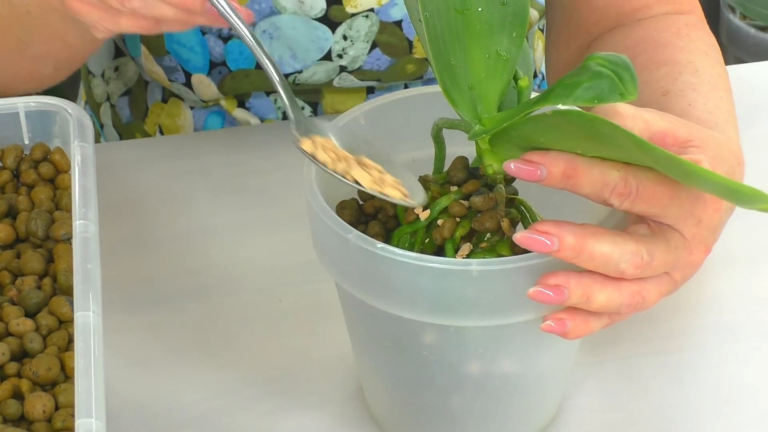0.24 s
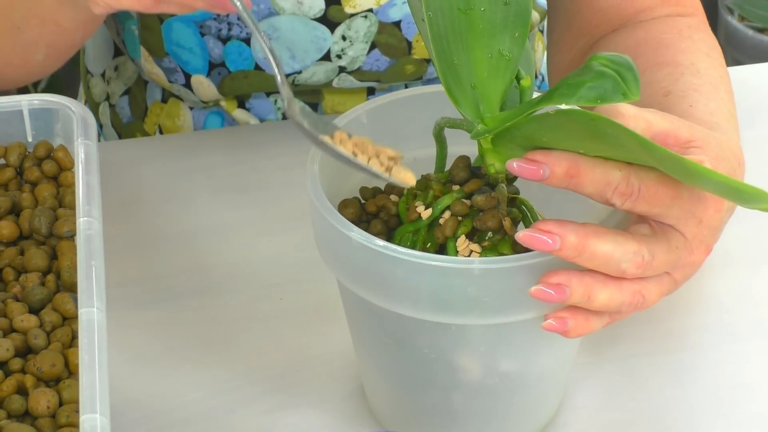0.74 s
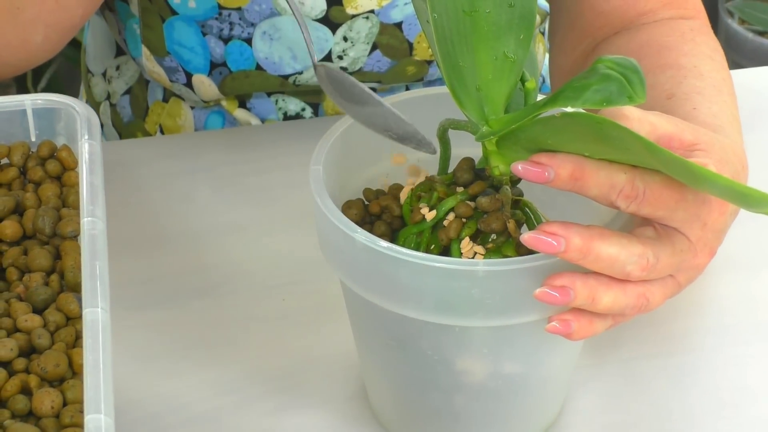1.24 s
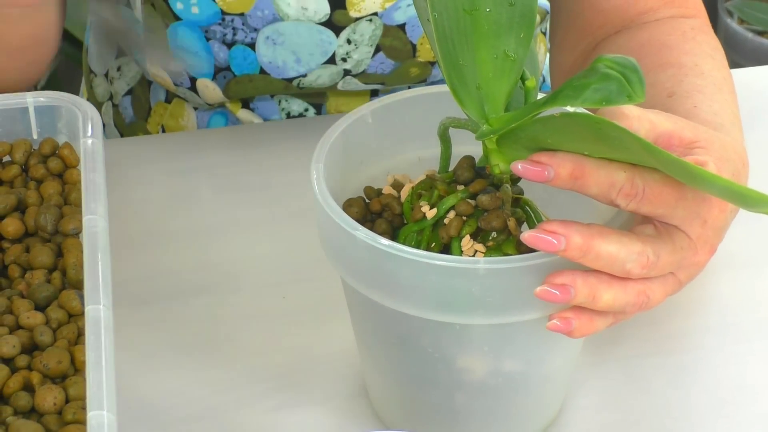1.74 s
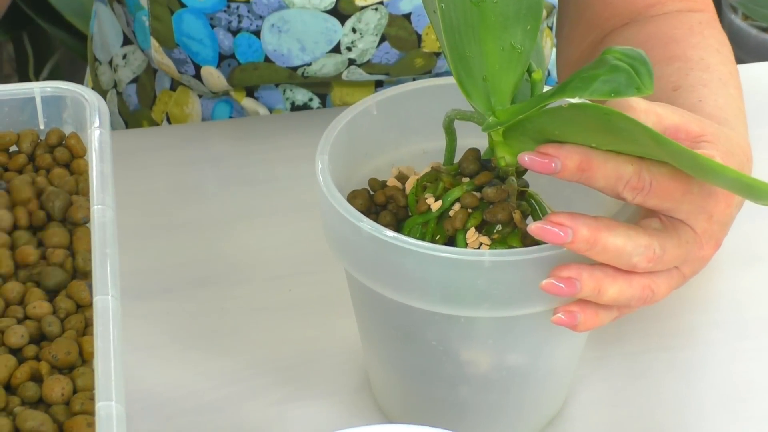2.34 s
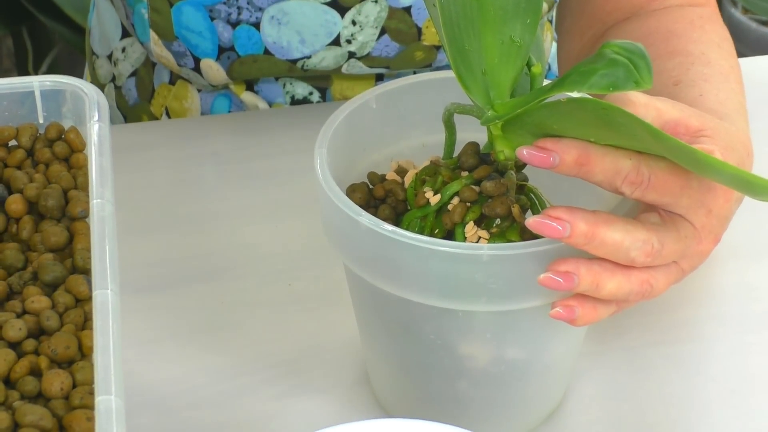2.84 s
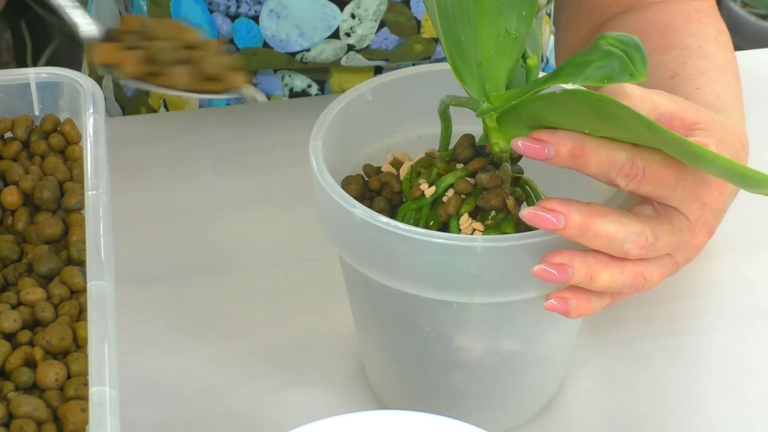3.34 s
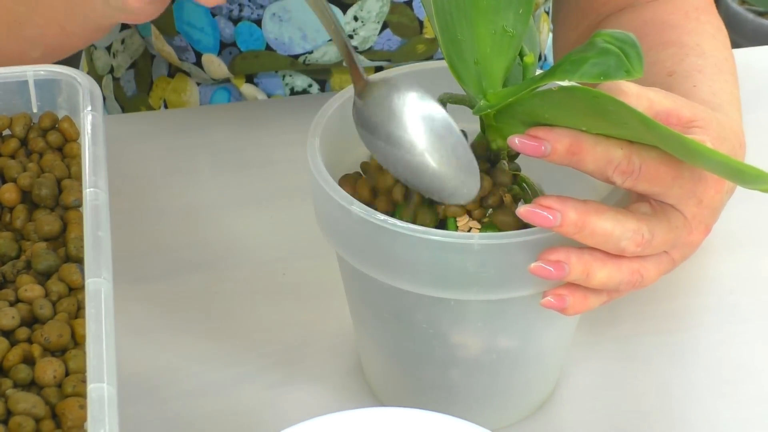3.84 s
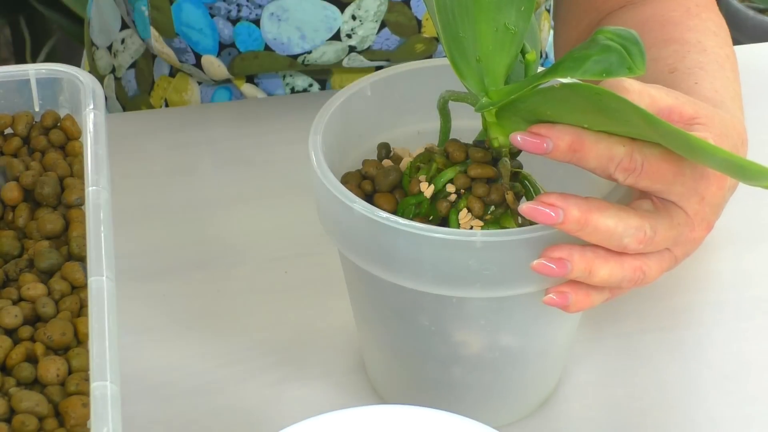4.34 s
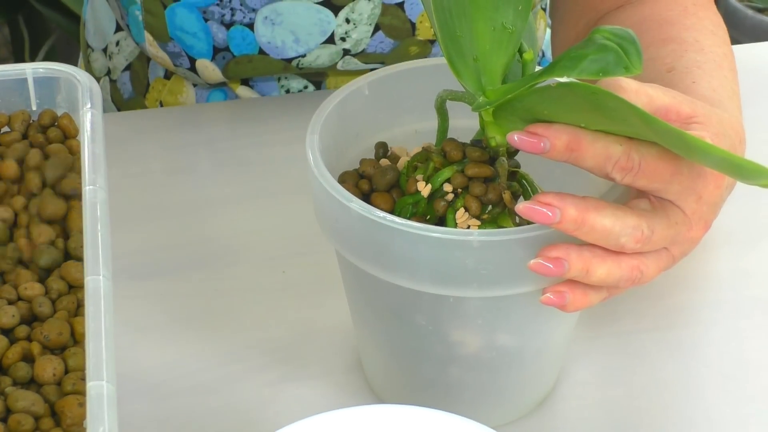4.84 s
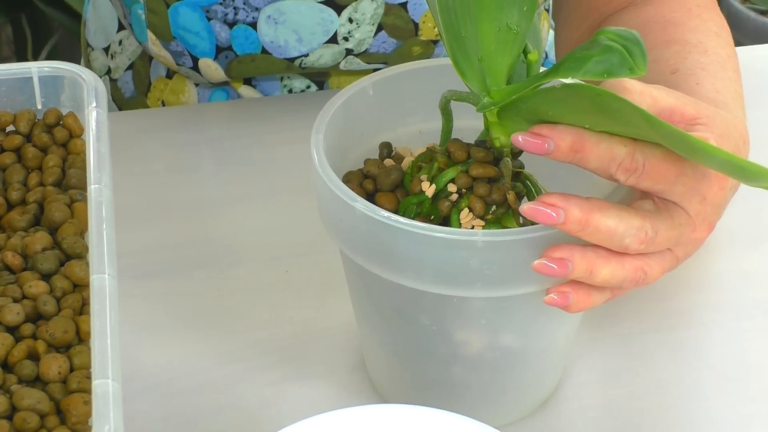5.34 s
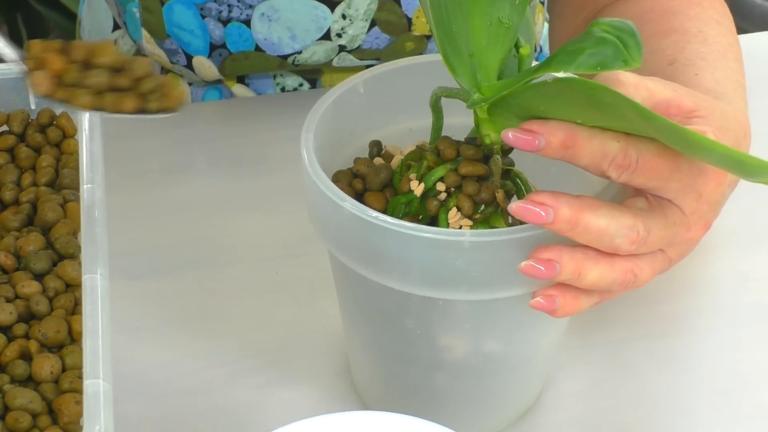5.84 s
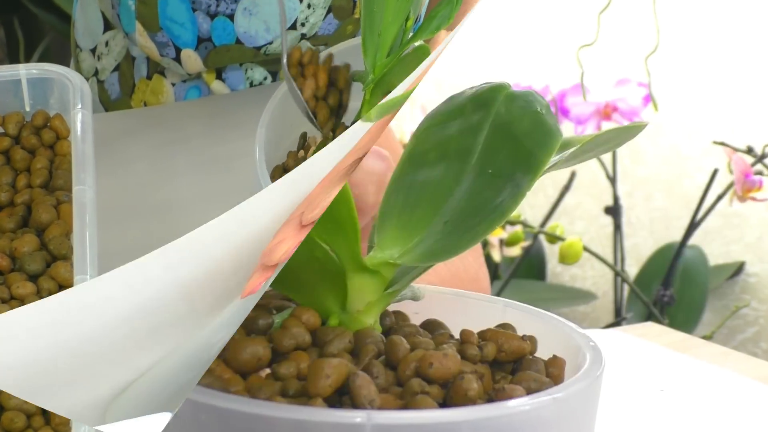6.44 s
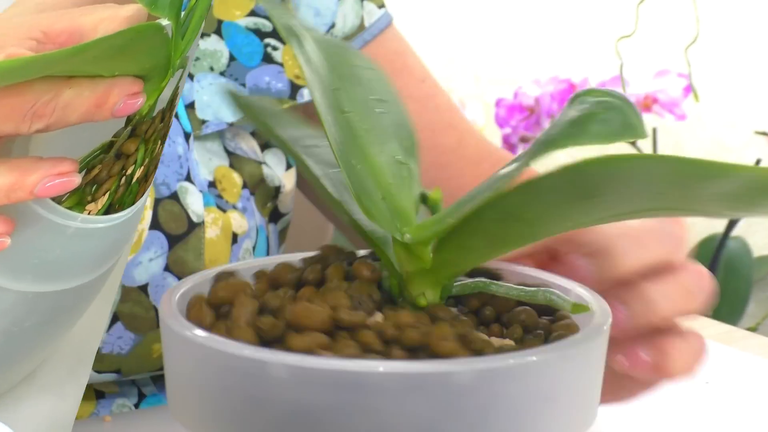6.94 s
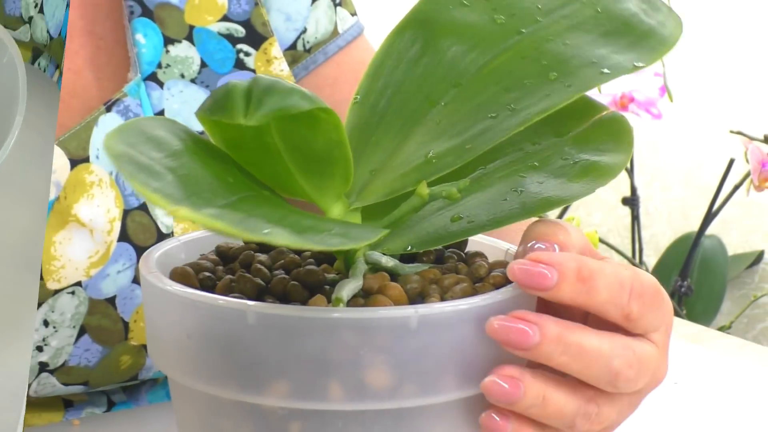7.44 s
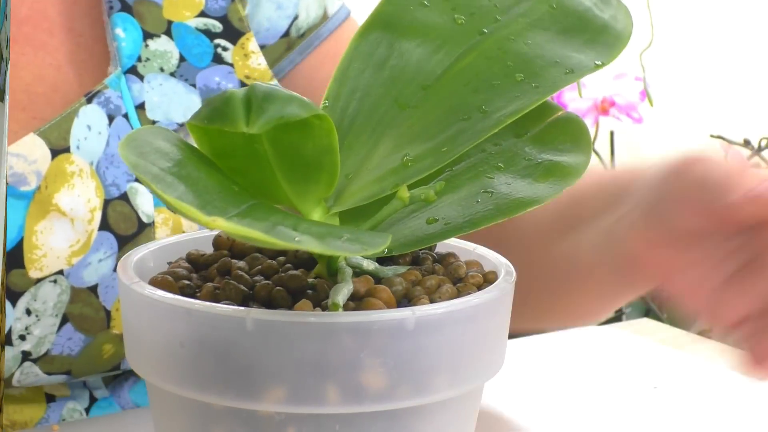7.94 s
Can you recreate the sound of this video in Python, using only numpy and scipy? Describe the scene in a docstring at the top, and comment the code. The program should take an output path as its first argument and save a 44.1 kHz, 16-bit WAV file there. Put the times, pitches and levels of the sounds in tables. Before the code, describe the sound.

Dry clay pellets slide off a metal spoon and rattle into a plastic pot, then the spoon crunches through a tub of pellets, repeatedly.

```python
"""A quiet room's hush comes first, then dry clay pellets slide off a steel spoon and rattle into a plastic pot.
The spoon then digs into a plastic tub of pellets; tipping and digging alternate three times.
Each pellet contact is a tiny noise crack, filtered by the heap and by the container's resonances.
Contacts on the steel ring the spoon's modes; late on, one knock rings the pot. A small room answers."""
import sys
import numpy as np
from scipy import signal
from scipy.fft import rfft, irfft, next_fast_len
from scipy.io import wavfile
from scipy.ndimage import map_coordinates

SR = 44100
rng = np.random.default_rng(int(sys.argv[2]) if len(sys.argv) > 2 else 0)


def store_pcm(level_fs):
    """Save levels as 16-bit WAV."""
    pcm = np.round(np.clip(level_fs, -1, 1) * 32767).astype(np.int16)
    wavfile.write(sys.argv[1], SR, np.atleast_2d(pcm).T)


N = 360738


def amp(db):
    """Level definition: dB to amplitude gain."""
    return 10 ** (np.asarray(db) / 20)


def along(points, hz):
    """Logarithmic frequency scale: interpolates (frequency [Hz], value) points."""
    f, v = np.transpose(points)
    return np.interp(np.log(hz + 1), np.log(f + 1), v)


def over_time(points):
    """Linear interpolation of (time [s], value) points, one value per sample."""
    return np.interp(np.arange(N) / SR, *np.transpose(points))


def filtered(x, response):
    """Linear filtering: the spectrum of x times a complex response of frequency."""
    m = next_fast_len(N + SR // 2)
    return irfft(rfft(x, m) * response(np.fft.rfftfreq(m, 1 / SR)), m)[..., :N]


def through(x, impulse):
    """Convolution with an impulse response scaled to unit energy."""
    return signal.oaconvolve(x, impulse / np.linalg.norm(impulse))[:N]


def colour(spectrum, size=2048):
    """Minimum phase: the causal impulse with this spectrum, by folding its cepstrum."""
    cepstrum = irfft(np.log(amp(np.maximum(along(spectrum, np.fft.rfftfreq(size, 1 / SR)), -70))))
    cepstrum[1:size // 2] *= 2
    cepstrum[size // 2 + 1:] = 0
    return irfft(np.exp(rfft(cepstrum)))


def ringing(modes):
    """Modal synthesis: a sum of exponentially damped sines, (frequency [Hz], level [dB], t60 [s])."""
    t = np.arange(SR // 2) / SR
    return sum(amp(db - 60 * t / t60) * np.sin(2 * np.pi * hz * t) for hz, db, t60 in modes)


def walls(peaks):
    """Bandwidth and decay are reciprocal: wall resonances given by width become damped sines."""
    return ringing([(hz, db + 20 * np.log10(width), np.log(1000) / (np.pi * width))
                    for hz, width, db in peaks])


def gains(tables):
    """Piecewise level envelopes: a gain per sample for each dB column, silent between the tables."""
    t, out = np.arange(N) / SR, np.zeros((len(tables[0][0]) - 1, N))
    for rows in tables:
        s, *columns = np.transpose(rows)
        out += [amp(np.interp(t, s, column, -200, -200)) for column in columns]
    return out


def wander(per_s):
    """Random modulation: straight pieces between normal random values, per_s of them a second."""
    knots = rng.standard_normal(int(N * per_s / SR) + 4)
    return map_coordinates(knots, [np.arange(N) * per_s / SR], order=1)


def cracks(blows, t60):
    """Decaying noise bursts: energies of overlapping blows add, and each burst has its own colour."""
    fade = amp(-60 * np.arange(SR // 20) / SR / t60)
    energy = signal.oaconvolve(blows ** 2, fade ** 2)[:N]
    return np.sqrt(np.abs(energy)) * rng.standard_normal(N)


def contacts(per_s, spread_db, t60, blur):
    """Shot noise of pellet contacts, many small and a few large, plus steady noise for the dense share."""
    chance, size = rng.random((2, N))
    blows = (chance < per_s / SR) * amp(-spread_db * np.log(size + 0.0092))
    x = cracks(blows, t60)
    blur = np.clip(blur, 0, 1)  # power share too dense to tell apart
    return np.sqrt(1 - blur) * x / x.std() + np.sqrt(blur) * rng.standard_normal(N)


RAP_SCATTER, RAP_CYCLES = 0.356, 9.5  # spread of log pitch; t60 in cycles
RAP_DB = -8  # against the crunch


def raps(gain, per_s, centre_hz):
    """Cavity resonance: random pellets each ring briefly and hollowly at a pitch of their own."""
    when, size, pitch = rng.random((3, round(2 * per_s * N / SR)))
    at, t = (when * (N - 1)).astype(int), np.arange(SR // 80) / SR
    log_offset = RAP_SCATTER * np.log(pitch / (1 - pitch)) / 2
    hz = np.clip(centre_hz * np.exp(log_offset), 820, 6000)[:, None]
    decay = amp(-60 * t * hz / RAP_CYCLES)
    onset = 1 - np.exp(-t * hz)
    rings = amp(-3 * np.log(size + .05))[:, None] * decay * np.sin(2 * np.pi * hz * t) * onset
    rings *= np.sqrt(N / np.sum(rings ** 2)) * gain[at, None]  # rms 1, then the crunch gain
    samples = at[:, None] + np.arange(len(t))
    return amp(RAP_DB) * np.bincount(samples.ravel(), rings.ravel(), N + SR)[:N]


HEAP_SHIFT, HEAP_SHIFTS_PER_S = 0.21, 22  # the heap's hollows change as it moves: rise in log pitch, rate
HOLLOW_HZ = 1557  # corner of the high-pass that thins the body


def rattle(levels, crunch, fizz, box, per_s, spread_db, blur, low_db, rap_hz):
    """Source and filter: the same contacts excite heap and container; denser, shorter ones tick brightly."""
    crunch_gain, fizz_gain, box_gain = levels
    heap = contacts(per_s, spread_db, 0.014, blur)
    ticks = contacts(2.2 * per_s, spread_db, 0.012, blur)

    # an equal-power crossfade wanders between two heap spectra, the second higher in pitch
    turn = np.pi / 4 * (1 + np.tanh(wander(HEAP_SHIFTS_PER_S)))
    deep = colour(crunch)
    tight = colour([(hz * np.exp(HEAP_SHIFT), db) for hz, db in crunch])
    deep_drive = crunch_gain * heap * np.cos(turn)
    tight_drive = crunch_gain * heap * np.sin(turn) * rng.choice([-1, 1], N)
    body = through(deep_drive, deep) + through(tight_drive, tight) + raps(crunch_gain, per_s, rap_hz)

    # lowering the low crunch hands over to a high-passed copy
    thin = filtered(body, lambda hz: (1j * hz / (HOLLOW_HZ + 1j * hz)) ** 3)
    body = amp(low_db) * body + 2 * (1 - amp(low_db)) * thin
    return body + through(fizz_gain * ticks, colour(fizz)) + through(box_gain * heap, walls(box))


# Spectrum of the hush: (frequency [Hz], relative density [dB per Hz])
AIR_SPECTRUM = [(12, -54), (20, -7.5), (38, -12.5), (74, -10), (182, -2.5), (255, -7.5), (285, -5),
                (422, -10), (558, -19.5), (897, -10.5), (1120, -11), (2600, -16), (5230, -32),
                (16000, -25.5)]
# Left-right correlation of the hush: (frequency [Hz], likeness [0 to 1])
AIR_LIKENESS = [(60, 0.4), (240, 0.54), (950, 0.74), (3770, 0.22), (15000, 0.99)]
AIR_DB = -55  # rms level of its mid signal


def air():
    """Partly coherent field: the steady hush of the room and the microphone, as mid and side noise."""
    def mid_and_side(hz):
        turn = np.arccos(np.clip(along(AIR_LIKENESS, hz), -1, 1)) / 2
        return amp(along(AIR_SPECTRUM, hz)) * [np.cos(turn), np.sin(turn)]

    mid, side = filtered(rng.standard_normal((2, N)), mid_and_side)
    return amp(AIR_DB) * np.array([mid + side, mid - side]) / mid.std()


# Modes of the steel bowl: (frequency [Hz], relative level [dB], t60 [s])
SPOON_MODES = [(2815, -2, .045), (3640, -4, .04), (5300, -8, .05), (6610, 3, .065), (7630, -11, .06),
               (8500, -6, .06), (9780, -7, .06), (10195, 2, .08), (11700, -13, .05), (12680, -2, .06),
               (13930, -4, .05), (14750, -10, .05)]
# Pellets sliding over steel; a release later than the end leaves the ring to stop at full level:
# (start [s], full [s], release [s], end [s], ring [dB])
SLIDES = [(0.297, 0.424, .6, 0.64, -52), (2.031, 2.041, 2.8, 2.6, -40.5), (3.75, 3.779, 3.75, 4.1, -41),
          (4.51, 4.525, 6.6, 5, -40), (6.364, 6.428, 6.7, 6.9, -40), (7.413, 7.423, 8.3, 7.5, -55.5),
          (7.52, 7.68, 10, 8.5, -43)]
SLIDE_FADE_DB = 17.5  # how far under the full ring a slide starts, and ends if released
CLINK_DB = -14.5  # a pellet that strikes during a dig also rings the spoon, against its tick


def spoon():
    """Modal excitation by position: contacts wander over the bowl, so each mode swells and fades alone."""
    shapes = [[(start, db - SLIDE_FADE_DB), (full, db), (release, db), (end, db - SLIDE_FADE_DB)]
              for start, full, release, end, db in SLIDES]
    strokes = gains(shapes)[0] * contacts(700, 4.5, 0.0021, 0.3)
    for s, tick_db, *_ in PELLET_STRIKES:
        if any(rows[0][0] <= s <= rows[-1][0] for rows in DRAGS):
            strokes[round(s * SR)] += amp(tick_db + CLINK_DB) * np.sqrt(SR / 1000)

    out = np.zeros(N)
    for mode in SPOON_MODES:
        place = amp(2.5 * wander(12))
        out += signal.oaconvolve(strokes * place, ringing([mode])[:SR // 8])[:N]
    return out / np.linalg.norm(ringing(SPOON_MODES))


# Reverberation time: (frequency [Hz], t60 [s])
ROOM_DECAY = [(200, 0.36), (1500, 0.28), (5000, 0.082), (14000, 0.12)]
# Diffuse share: (frequency [Hz], level [dB])
ROOM_SHARE = [(200, -6), (1000, -5.5), (3000, -7), (7000, -16.5), (14000, -73)]


def room(x):
    """Diffuse reverberation: decaying noise tails, new every fifth of a second, different in each channel."""
    out, hop = np.zeros((2, N + SR)), SR // 5
    delay = 130  # samples, about 3 ms
    hz, t, _ = signal.stft(np.zeros(SR // 3), SR, nperseg=128)
    t60 = along(ROOM_DECAY, hz)[:, None]
    shape = amp(along(ROOM_SHARE, hz)[:, None] - 60 * t / t60) / np.sqrt(t60)
    for a in range(0, N, hop):
        z = signal.stft(rng.standard_normal((2, SR // 3)), SR, nperseg=128)[2]
        tail = signal.istft(z * shape, SR, nperseg=128)[1] * np.sqrt(2 * np.log(1000) / SR)
        y = signal.fftconvolve(x[None, a:a + hop], tail, axes=1)
        out[:, a + delay:a + delay + y.shape[1]] += y
    return out[:, :N]


# Steady trickles into the pot: (time [s], crunch [dB], fizz [dB])
TRICKLES = [
    [(.4, -85, -63.5), (.54, -52, -54), (1.2, -42, -48.5), (1.24, -37, -36.5), (1.46, -41.5, -47),
     (1.62, -42, -60), (1.75, -84, -83)],
    [(3.7, -65, -58.5), (3.96, -36, -37), (4.09, -32.5, -37), (4.34, -48.5, -45.5), (4.48, -59, -66)],
    [(6.36, -63, -62.5), (6.48, -51, -36), (6.55, -33, -31), (6.73, -35.5, -29), (6.95, -38.5, -41),
     (6.97, -40, -51), (7.18, -59, -64)],
]
# Clumps that land in the pot, then tumble to rest: (time [s], crunch [dB], fizz [dB], t60 [s])
CLUMPS = [(0.549, -32, -41, 0.59), (0.622, -33, -31, 0.11), (0.697, -32.5, -39.5, 0.16),
          (0.7563, -37, -44, 0.12), (0.907, -30.5, -47, .084), (0.995, -31, -29.5, 0.04),
          (1.0054, -23.5, -26, 0.18), (1.1086, -29.5, -30, 0.15), (1.227, -28, -44, 0.11),
          (1.281, -36.5, -44, 0.37), (1.3526, -26.5, -28, 0.12), (1.41, -34, -30.5, 0.27),
          (1.5245, -30.5, -48, 0.082), (1.557, -37, -44, 0.24), (3.774, -54, -35.5, 1),
          (3.883, -33, -36, 0.39), (3.905, -27.5, -32, 0.19), (3.994, -22.5, -35, 0.077),
          (4.0617, -32, -40, 0.22), (4.09, -26, -33, 0.36), (4.1614, -24, -36, 0.094),
          (4.181, -25, -36, 0.29), (4.228, -30, -36, .067), (4.313, -36.5, -45.5, 0.099),
          (6.571, -31, -53, 0.17), (6.6438, -24.5, -41.5, 0.27), (6.6972, -26, -43, .24),
          (6.779, -26.5, -34.5, 0.13), (6.852, -28, -36.5, 0.17), (7.19, -28, -35, 0.49),
          (7.283, -44, -48, .24)]
POT_TRICKLE_DB, POT_CLUMP_DB = -13.5, -27  # pot ring against the crunch


def tumbling_gains():
    """Exponential relaxation: the trickle, and a jump with each clump that dies away; crunch, fizz, pot."""
    out, t = np.zeros((3, N + SR)), np.arange(SR // 4) / SR
    for s, crunch_db, fizz_db, t60 in CLUMPS:
        start_db = np.c_[[crunch_db, fizz_db, crunch_db + POT_CLUMP_DB]]
        out[:, round(s * SR):][:, :len(t)] += amp(start_db - 60 * t / t60)
    crunch, fizz = gains(TRICKLES)
    return out[:, :N] + [crunch, fizz, amp(POT_TRICKLE_DB) * crunch]


# Spectrum of the poured heap: (frequency [Hz], relative density [dB per Hz])
POUR_CRUNCH = [(470, -35.5), (800, -20), (968, -2), (1050, 2), (1450, 0.5), (1850, 4.5), (2090, 1.5),
               (3140, 1.5), (3500, 1.5), (5800, -9), (7540, -11.5), (12800, -120)]
# Spectrum of the bright ticks in the pour: (frequency [Hz], relative density [dB per Hz])
POUR_FIZZ = [(2650, -24.5), (4500, -11.5), (6320, -3), (10300, 0), (14200, -7), (16000, -9.5)]
# Resonances of the pot: (frequency [Hz], width [Hz], relative level [dB])
POT_RESONANCES = [(185, 150, -16), (334.4, 24, 5), (410, 70, -3)]
# Low crunch of the pour, capped at 0 dB; fine grains sound thin: (time [s], level [dB])
POUR_LOWS = [(.5, -13.5), (1.18, -7.5), (1.24, -4), (1.7, -1), (3.9, -3.5), (6.4, -4), (6.9, -2.5),
             (7.1, 14)]


def pouring():
    """Granular impact noise: tumbling pellets excite the heap and the resonances of the pot."""
    return rattle(tumbling_gains(), POUR_CRUNCH, POUR_FIZZ, POT_RESONANCES, per_s=300, spread_db=2.3,
                  blur=0.42, rap_hz=2990, low_db=np.minimum(0, over_time(POUR_LOWS)))


# Single pellets that stand out:
# (time [s], tick before its gain [dB], nominal rap peak [dB], rap pitch [Hz])
PELLET_STRIKES = [(0.548, -50.5, -19, 3320), (.5578, -55, -23, 3680), (0.5672, -31.5, -12.5, 4070),
                  (.5807, -26, -35, 3200), (0.6214, -33.5, -24, 1840), (.687, -36, -28, 3200),
                  (0.696, -30, -18.5, 2600), (.843, -37.5, -28, 3300), (.868, -28.5, -22, 3270),
                  (0.907, -33, -20, 1860), (0.994, -17.5, -14, 3220), (1.004, -18.5, -21, 2460),
                  (1.01, -21, -29, 2840), (1.054, -22.5, -39, 3260), (1.1085, -16, -20, 3700),
                  (1.115, -18, -14, 4060), (1.227, -26, -16.5, 1160), (1.282, -17, -37.5, 2560),
                  (1.298, -20, -19, 1130), (1.333, -28, -24, 1500), (1.3524, -20, -32, 3230),
                  (1.5252, -29.5, -25, 1620), (1.559, -31, -22, 1590), (2.0302, -18.5, -9, 2470),
                  (2.0447, -29.5, -8, 2580), (2.108, -27.5, -7, 2720), (2.2034, -16, -11, 2800),
                  (2.2188, -13, -43, 1140), (2.2897, -48.5, -11, 940), (2.4856, -22.5, -30, 2250),
                  (2.7066, -20, -26, 1890), (2.817, -24.5, -32, 1270), (2.776, -16.5, -37, 1010),
                  (2.8707, -36, -31, 2690), (2.8898, -20, -26, 1760), (2.9053, -21.5, -29.5, 1140),
                  (2.983, -42, -32, 1760), (3.012, -28.5, -34, 1230), (3.0653, -38, -34, 1030),
                  (3.141, -41, -34.5, 1500), (3.0846, -30, -28.5, 1140), (3.905, -14.5, -7, 3040),
                  (3.994, -24, -16.5, 3350), (4.061, -26.5, -18, 1800), (4.083, -18.5, -24.5, 2770),
                  (4.1609, -23, -6, 2570), (4.1997, -22, -6, 3130), (4.2296, -23.5, -15.5, 1640),
                  (4.313, -29.5, -27, 2600), (4.509, -29, -13, 2610), (4.535, -14, -11, 1130),
                  (4.546, -16, -7.5, 1350), (4.584, -21, -9.5, 1260), (4.638, -12.5, -9, 3600),
                  (4.764, -17, -27.5, 2840), (5.0134, -20, -24, 3650), (5.2569, -11.5, -24, 1250),
                  (5.302, -23.5, -38, 1200), (5.3344, -18.5, -24.5, 1080), (5.4419, -30, -36, 1120),
                  (5.5262, -38.5, -39, 934), (5.612, -41, -32, 1200), (5.665, -38, -36, 1190),
                  (5.46, -26.5, -30, 1200), (5.902, -41, -68, 1340), (6.5445, -14.5, -27, 4360),
                  (6.571, -20, -37, 2260), (6.6436, -21, -37, 2980), (6.697, -19, -8, 4470),
                  (6.713, -16, -22, 2440), (6.7342, -14.5, -31, 3030), (6.7973, -15, -16, 3240),
                  (6.852, -19, -16, 3100), (6.874, -28, -25, 2540), (6.943, -31, -28, 3000),
                  (7.0863, -33, -60, 2310), (7.168, -55, -27, 2050), (7.282, -38, -15.5, 2330),
                  (7.4794, -33.5, -32, 1420), (7.491, -32, -40, 1500), (7.513, -32.5, -23, 1180),
                  (7.559, -18.5, -15.5, 1390), (7.676, -20, -7.5, 1370), (7.679, -24, -9, 2300),
                  (7.7479, -26, -11, 1420), (7.8282, -23.5, -10, 1450), (8.0933, -30, -18, 1760)]
# Spectrum of single ticks and of the ticks in the dig: (frequency [Hz], relative density [dB per Hz])
FIZZ = [(2650, -32.5), (4500, -13.5), (5680, -5), (6630, -1), (7260, -2), (9920, 1.5), (12000, -2),
        (14400, 0.5), (16000, -12.5)]


def clicks():
    """Impact and local resonance: a sharp tick, and a short hollow rap at the pitch of the spot struck."""
    tick, rap, t = np.zeros(N), np.zeros(N + SR), np.arange(SR // 30) / SR
    for s, tick_db, rap_db, hz in PELLET_STRIKES:
        tick[round(s * SR)] = amp(tick_db)
        life = 16 / hz  # t60: a fixed number of cycles
        overtone_hz = hz * rng.uniform(1.3, 1.45)
        pair = np.sin(2 * np.pi * hz * t) + 0.16 * np.sin(2 * np.pi * overtone_hz * t)
        onset = 1 - np.exp(-2 * hz * t)
        rap[round(s * SR):][:len(t)] += amp(rap_db - 60 * t / life) * pair * onset
    snap = 2.2 * tick + .9 * cracks(tick, .006)
    return through(snap, colour(FIZZ)) + rap[:N]


LAND_DB, LAND_POT_DB = 13, -2.5  # landing crack against the crunch; the pot's ring against that crack


def landings():
    """Impulsive excitation: each clump opens with one hard crack that also knocks the pot."""
    blows = np.zeros(N)
    for s, crunch_db, *_ in CLUMPS:
        blows[round(s * SR)] = amp(crunch_db)
    crack = blows + .5 * cracks(blows, .004)
    pot_ring = amp(LAND_DB + LAND_POT_DB) * through(blows, walls(POT_RESONANCES))
    return amp(LAND_DB) * through(crack, colour(POUR_CRUNCH)) + pot_ring


# The spoon drags through the tub: (time [s], crunch [dB])
DRAGS = [
    [(2.03, -32), (2.38, -33.5), (2.45, -38.5), (2.78, -39), (2.92, -44.5), (3.04, -56), (3.2, -65)],
    [(4.508, -70.5), (4.56, -38.5), (4.95, -31.5), (5.2, -36), (5.42, -44.5), (5.57, -59), (5.75, -63.5)],
    [(7.45, -55), (7.505, -51.5), (7.52, -43), (7.7, -29), (7.9, -27.5), (7.97, -37.5), (8.18, -37.5)],
]
# Brightness of the drag: (time [s], fizz over crunch [dB])
DRAG_BRIGHTNESS = [(2.03, 1.5), (2.4, 2), (2.55, 8), (2.9, 6.5), (3.0, -1), (4.51, -6.5), (4.95, 0),
                   (5.16, 7), (5.45, 3.5), (5.6, -3), (7.5, -3), (7.95, 0), (8.18, 6.5)]
# Shoves that make the heap give way: (time of peak [s], crunch [dB], fizz [dB], rise [s])
SHOVES = [(2.032, -20.5, -22.5, .002), (2.108, -26, -26, 0.038), (2.176, -21.5, -15, 0.032),
          (2.22, -23.5, -26, 0.019), (2.29, -26, -22.5, .03), (2.356, -23, -22, 0.036),
          (3.087, -46, -44, .03), (4.509, -34.5, -46.5, 0.0033), (4.537, -22.5, -25, 0.0018),
          (4.546, -29, -23, .008), (4.584, -24.5, -25, 0.0097), (4.636, -23.5, -21.5, 0.015),
          (4.71, -22, -20, 0.033), (4.767, -21, -18.5, 0.036), (4.805, -22.5, -22, .02),
          (4.96, -32.5, -27, 0.09), (5.63, -49, -50, 0.015), (7.516, -33.5, -32, 0.0023),
          (7.565, -32, -36.5, 0.025), (7.677, -23, -23.5, 0.033), (7.75, -26, -29.5, 0.052),
          (7.85, -22, -22, 0.07), (8.1, -38, -39, 0.036)]
RISE_DB, SETTLE_DB_PER_S = 12, 283  # climb over the rise time; fall after the peak
TUB_DB = -9  # tub ring against the drag and shove crunch


def digging_gains():
    """Build-up and yield: the drag, and a swell for each shove, added by power; crunch, fizz and tub."""
    t, (crunch,) = np.arange(N) / SR, gains(DRAGS)
    fizz = crunch * amp(over_time(DRAG_BRIGHTNESS))
    for s, crunch_db, fizz_db, rise in SHOVES:
        near = slice(round((s - 2 * rise) * SR), round((s + .2) * SR))
        climb_db = RISE_DB * (t[near] - s) / rise
        settle_db = SETTLE_DB_PER_S * (s - t[near])
        swell = amp(np.minimum(climb_db, settle_db))
        crunch[near] = np.hypot(crunch[near], amp(crunch_db) * swell)
        fizz[near] = np.hypot(fizz[near], amp(fizz_db) * swell)
    return crunch, fizz, amp(TUB_DB) * crunch


# Spectrum of the heap in the tub: (frequency [Hz], relative density [dB per Hz])
DIG_CRUNCH = [(470, -62.5), (800, -22), (907, -3.5), (1040, 5.5), (2030, 1.5), (2320, 4.5), (2850, 3.5),
              (3150, -1), (3660, -1.5), (5200, -6), (6760, -65), (11400, -120)]
# Resonances of the tub: (frequency [Hz], width [Hz], relative level [dB])
TUB_RESONANCES = [(268, 110, -9.5), (467.5, 117, 5), (669, 34, 0.5)]


def digging():
    """Granular shear noise: pellets displaced by the spoon excite the heap and the resonances of the tub."""
    return rattle(digging_gains(), DIG_CRUNCH, FIZZ, TUB_RESONANCES, per_s=400, spread_db=2.5,
                  blur=0.49, low_db=-0.5, rap_hz=1480)


# The pot is struck: (time [s], strength [dB])
KNOCKS = [(7.1914, -15)]
# Modes of the struck pot wall: (frequency [Hz], relative level [dB], t60 [s])
KNOCK_MODES = [(114, -18, .45), (258, -21, .55), (275, -3, .03), (341.4, -9, .12), (422, -7.5, .1),
               (490, -3.5, .073), (724, .5, .028), (1120, 8, .014), (1320, 11.5, .014), (2240, 3, .028)]
SHUDDER_DB, SHUDDER_S = -16.5, 0.49  # the pot rocks on the table after the knock: level, t60


def knock():
    """Contact time limits bandwidth: a half-millisecond blow rings the pot, softer rocking shudders on."""
    out, t = np.zeros(N + SR), np.arange(SR // 3) / SR
    push, soft = np.hanning(24), np.hanning(80)  # force pulses, in samples
    for s, db in KNOCKS:
        touches = rng.standard_normal(len(t)) * (rng.random(len(t)) < .02)
        rocking = amp(SHUDDER_DB - 60 * t / SHUDDER_S) * touches
        out[round(s * SR):][:len(t)] += amp(db) * np.convolve(rocking, soft / soft.sum())[:len(t)]
        out[round(s * SR):][:len(push)] += amp(db) * push / push.sum()
    return signal.fftconvolve(out, ringing(KNOCK_MODES))[:N]


# Position of the tub, raised on the left and lowered on the right: (time [s], left over centre [dB])
TUB_PAN = [(2, 0.8), (5.5, 0.7), (7.5, 1.2)]


def scene():
    """Superposition: the tub a little to the left, the pot near the middle, the room around them."""
    tub = digging()
    pot = pouring() + knock() + landings()
    loose = clicks() + spoon()
    tub_sides = amp(over_time(TUB_PAN) * [[1], [-1]])
    near = tub * tub_sides + pot * amp([[-.1], [.1]]) + loose * amp([[.2], [-.2]])
    small = lambda hz: (1j * hz / (100 + 1j * hz)) ** 3  # small objects radiate no deep bass
    return filtered(near + room(tub + pot + loose), small) + air()


TOP_HZ = 16000  # band limit


def record(dry):
    """Saturation and band limiting: the highest peaks are rounded and nothing from the limit up is kept."""
    rounded = dry / (1 + np.abs(dry / .75) ** 4) ** (1 / 4)
    return filtered(rounded, lambda hz: hz < TOP_HZ)


dry = scene()
out = record(dry)
store_pcm(out)
```